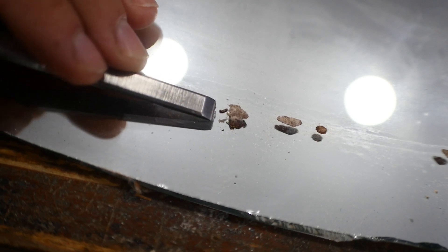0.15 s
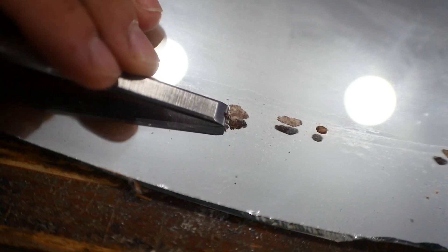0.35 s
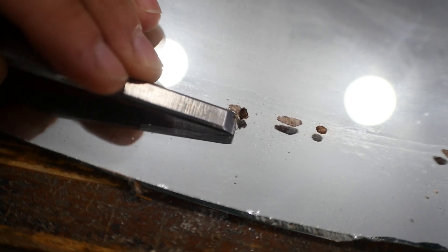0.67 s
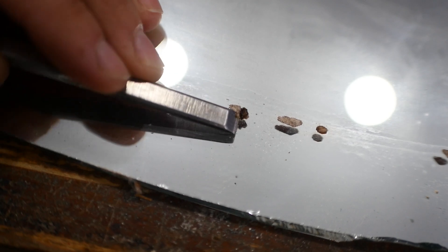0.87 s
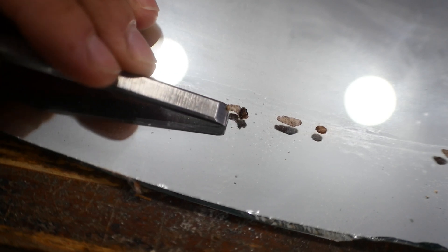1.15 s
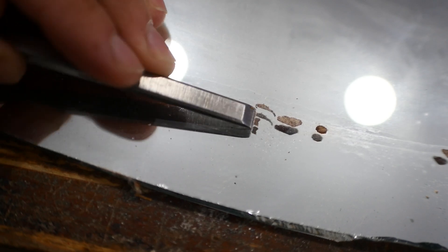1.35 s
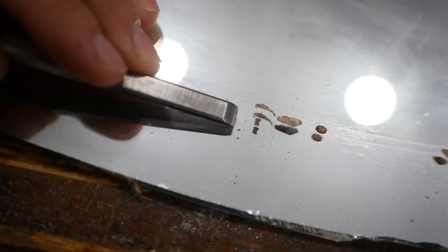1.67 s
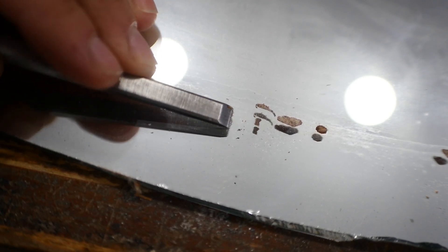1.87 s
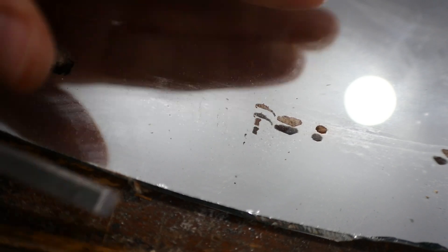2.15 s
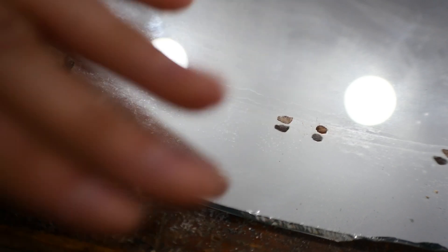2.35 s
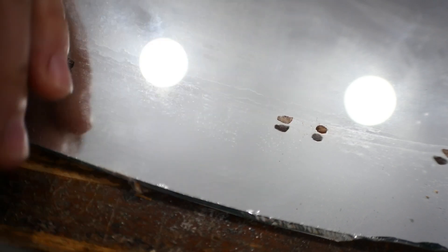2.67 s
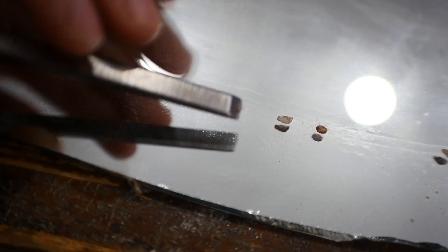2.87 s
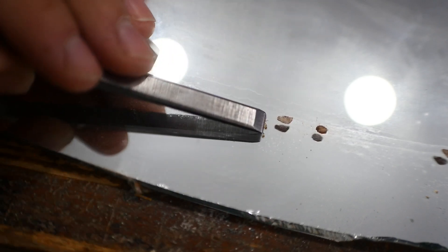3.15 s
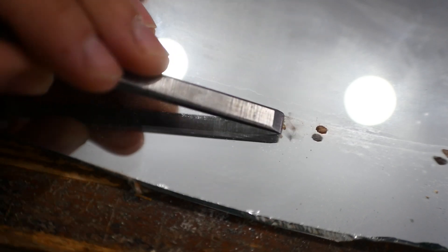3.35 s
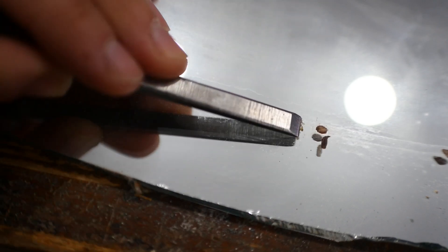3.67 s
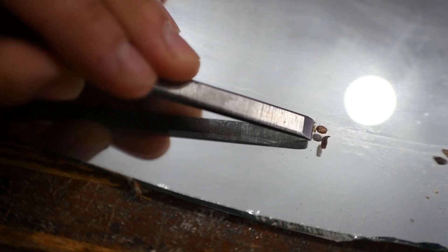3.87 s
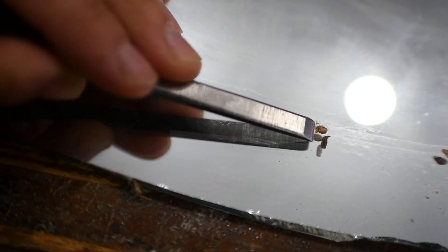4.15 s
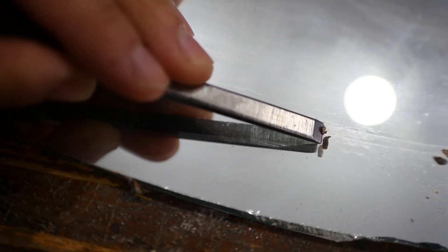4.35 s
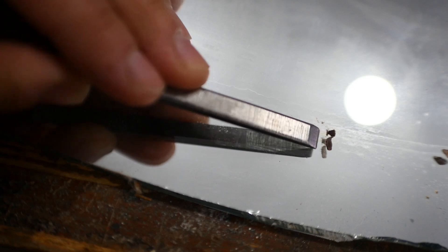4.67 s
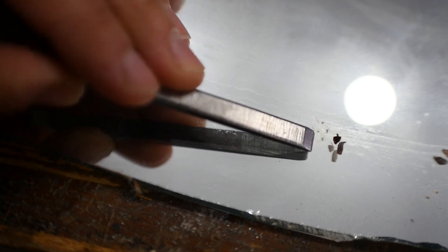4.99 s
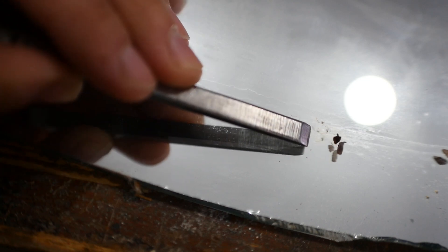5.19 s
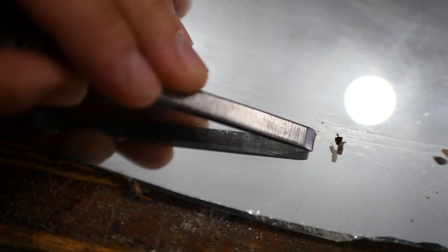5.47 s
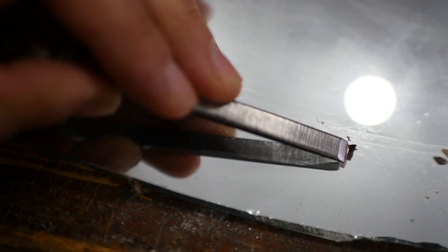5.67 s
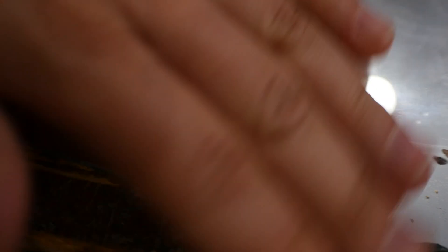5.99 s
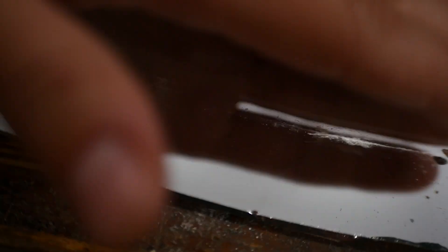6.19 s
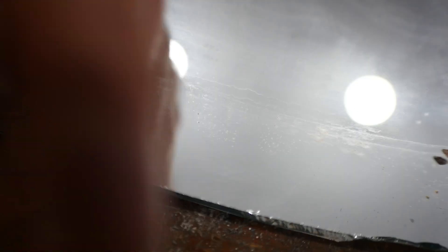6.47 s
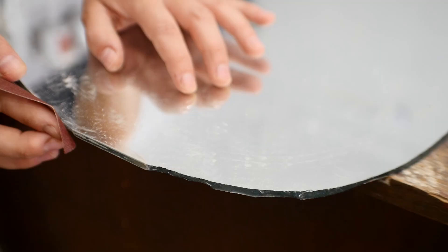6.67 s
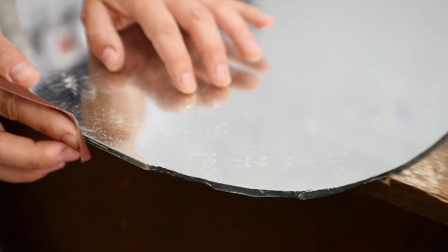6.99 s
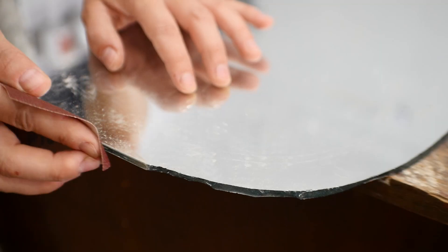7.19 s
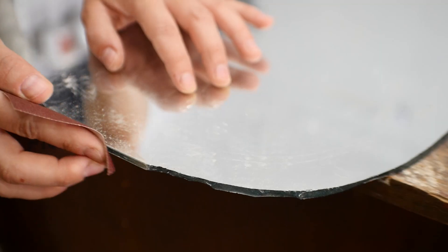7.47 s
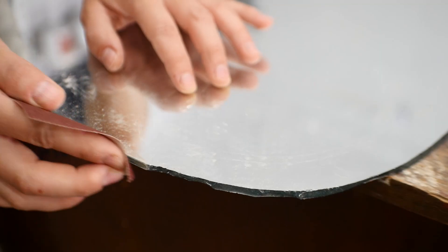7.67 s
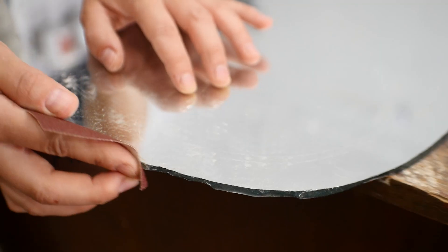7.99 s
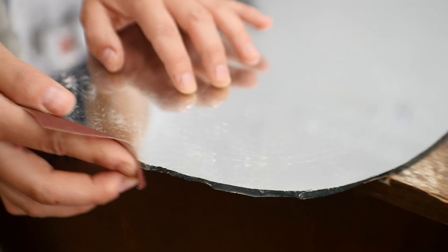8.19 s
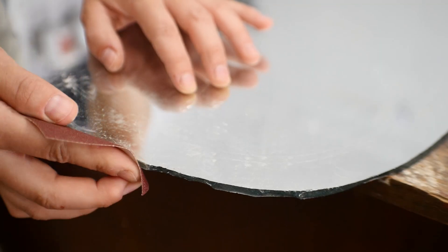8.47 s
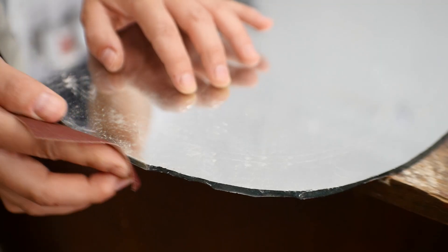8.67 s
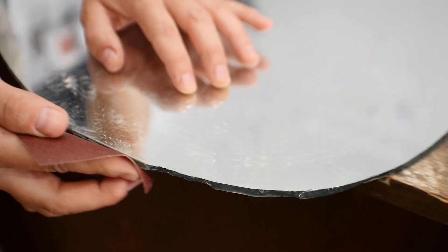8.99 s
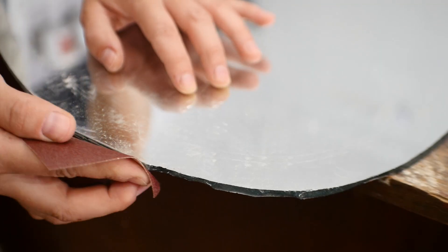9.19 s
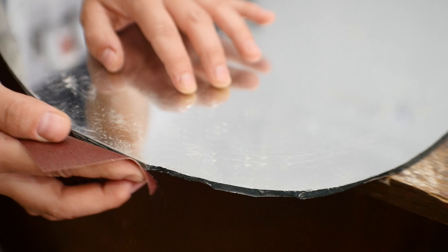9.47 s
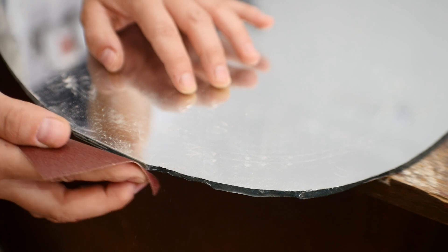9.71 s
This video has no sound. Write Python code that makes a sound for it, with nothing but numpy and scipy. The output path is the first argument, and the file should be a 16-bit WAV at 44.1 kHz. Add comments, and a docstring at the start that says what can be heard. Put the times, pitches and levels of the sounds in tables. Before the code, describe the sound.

Close up in a quiet workshop, a steel bar picks at dried lumps on a mirror with small bright ticks and thin slides. A palm swishes crumbs away, the bar clanks flat near three seconds, and faint picking resumes. More wipes with soft thuds follow, then abrasive paper rubs the glass edge in fast, gritty strokes to the end.

```python
"""Scraping and sanding a mirror

A quiet workshop, microphone close to a round mirror on a wooden bench. A steel scraper ticks and slides
on dried lumps: noise bursts ring steel, pane and bench. A palm hisses as it wipes the crumbs away, and
the bar comes down flat with a clank. Then abrasive paper rubs the edge, about eight strokes a second:
gritty noise swells between the turns and the glass sings faintly in its resonances. Room tone lies under it.
"""
import sys
import numpy as np
from scipy import signal
from scipy.fft import rfft, irfft, next_fast_len
from scipy.io import wavfile
from scipy.ndimage import uniform_filter1d, map_coordinates

SR = 44100
rng = np.random.default_rng(int(sys.argv[2]) if len(sys.argv) > 2 else 0)


def wav_out(sig):
    """Save sig, one row per channel (or a flat mono array), as 16-bit PCM at SR to the path in sys.argv[1]."""
    wavfile.write(sys.argv[1], SR, np.round(np.clip(np.atleast_2d(sig).T, -1, 1) * 32767).astype(np.int16))


N = 433931
T = np.arange(N) / SR


def amp(db):
    """Decibels to linear gain."""
    return 10 ** (np.asarray(db) / 20)


def unit(x):
    """Scale to rms 1."""
    return x / np.sqrt(np.mean(x ** 2) + 1e-20)


def along(points, hz):
    """Interpolate (Hz, value) points on a log frequency axis."""
    f, v = np.transpose(points)
    return np.interp(np.log(hz + 1), np.log(f + 1), v)


def wobble(rate):
    """A smooth random curve, rate knots a second."""
    knots = rng.standard_normal(int(N * rate / SR) + 4)
    return map_coordinates(knots, [T * rate])


def filtered(x, response):
    """Filter x by a complex response of frequency."""
    n = x.shape[-1]
    m = next_fast_len(n + SR // 2)
    return irfft(rfft(x, m) * response(np.fft.rfftfreq(m, 1 / SR)), m)[..., :n]


def modes(table, f):
    """Causal sum of resonances, each row a centre in Hz, a width in Hz and a peak in dB."""
    f = f.astype(np.float32)
    return sum(float(amp(db) * w) * 1j * f / (c * c - f * f + 1j * w * f) for c, w, db in table)


def band(f, lo_hz, hi_hz):
    """Causal soft-edged band."""
    return (1j * f / (lo_hz + 1j * f) * hi_hz / (hi_hz + 1j * f)) ** 2


def heard(pair, response, alike):
    """Two unrelated signals through a response of mean power 1 become left and right with the given likeness."""
    def mix(f):
        colour = response(f)
        turn = np.arccos(np.clip(along(alike, f), -1, 1)) / 2
        return colour / np.sqrt(np.mean(abs(colour) ** 2)) * np.array([np.cos(turn), np.sin(turn)])
    mid, side = filtered(pair, mix)
    return np.array([mid + side, mid - side])


def patchy(x, depth_db, size=6):
    """Random gain in patches of frequency and time."""
    z = signal.stft(x, nperseg=512)[2]
    field = uniform_filter1d(rng.standard_normal(z.shape[1:]), 6, 0)
    field = uniform_filter1d(field, size, 1)
    return signal.istft(z * amp(depth_db * unit(field)), nperseg=512)[1][:, :x.shape[1]]


def grit(spiky_db, patchy_db, size=N):
    """Two channels of friction noise, rms 1: grains of uneven size, in patches."""
    grains = np.repeat(rng.standard_normal(size // 24 + 1), 24)[:size]
    noise = rng.standard_normal((2, size)) * amp(spiky_db * grains)
    return unit(patchy(noise, patchy_db))


def bursts(s, db, ms, crumbs_db):
    """Noise of contacts: each falls 20 dB per contact time, then crumbs grind on more faintly."""
    env, t = np.zeros(N + SR), np.arange(SR // 4) / SR
    for start, level, life in np.broadcast(s, db, ms):
        shape = amp(-20 * t / (abs(life) / 1000)) + amp(crumbs_db - 20 * t / 0.056)
        onset = 1 - np.exp(-t / (abs(life) / 9000))
        env[round(start * SR):][:len(t)] += amp(level) * shape * onset
    return env[:N] * rng.standard_normal((2, N))


def swell(start, start_db, climb, top_db, rise, fall, hold=0):
    """Gain of gestures that climb from start_db to top_db and hold, coming and going at the given dB per second."""
    power = np.zeros(N)
    for a, a_db, s, b_db, up, down in np.broadcast(start, start_db, np.abs(climb) + 1e-4, top_db, rise, fall):
        knots = np.cumsum([a - 60 / up, 60 / up, s, abs(hold) + 1e-4, 60 / down])
        level_db = np.interp(T, knots, [a_db - 60, a_db, b_db, b_db, b_db - 60])
        power += amp(level_db) ** 2
    return np.sqrt(power)


# Spectrum of the room tone. Each row: frequency in Hz, relative level in dB.
AIR_SPECTRUM = [(15, -46), (25, -16), (76, -16), (141, -1), (180, -2), (335, -4), (677, -9), (840, -10.5),
                (1160, -8.5), (1480, -15), (2990, -21.5), (8140, -28), (10400, -24), (14000, -30.5),
                (16000, -38)]
# Narrow bands in the room tone. Each row: centre in Hz, width in Hz, relative level in dB.
HUM_BANDS = [(182.2, 4.7, 10), (227, 11, 1.2), (528, 3.2, 1.3), (680, 16, 6.3), (1200, 20, 1.5)]
# Left-right likeness of distant sound. Each row: frequency in Hz, likeness from -1 to 1.
FAR_LIKENESS = [(60, 0.84), (180, 1), (550, 0.82), (1650, -0.32), (4970, 0.094), (15000, 0.72)]
AIR_DB = -58  # centre of a slowly wandering level


def room_tone():
    """Distant rumble through the walls over the microphone's own hiss."""
    colour = lambda f: amp(along(AIR_SPECTRUM, f)) * (1 + .5 * abs(modes(HUM_BANDS, f)))
    tone = heard(grit(.1, 1.2), colour, FAR_LIKENESS)
    return amp(AIR_DB + 0.72 * wobble(3.105)) * unit(tone)


# Left-right likeness at close distance, for all work on the mirror. Each row: frequency in Hz, likeness.
NEAR_LIKENESS = [(60, 1), (180, 1), (550, 0.97), (1650, 0.4), (4970, 0.52), (15000, 0.49)]
# Scraper contacts. Each row: start in seconds, then drive of steel, pane and bench in dB.
CONTACTS = [(0.105, -47, -74, -74), (0.409, -51, -43.5, -41), (0.4198, -47.5, -54, -44),
            (0.6281, -59, -43.5, -36.5), (0.6529, -28.5, -34, -35), (0.701, -49, -61, -45),
            (0.9169, -45, -48, -42), (0.9594, -61, -57, -53), (1.1424, -62, -57, -31.5),
            (1.3565, -35.5, -48, -44), (1.3657, -23.5, -31, -33.5), (1.396, -29, -39.5, -36),
            (1.481, -52, -60, -54), (1.517, -48.5, -52, -49.5), (1.6327, -54.5, -59, -53),
            (1.662, -53.5, -56, -50), (1.7065, -55.5, -72, -62), (1.7697, -52, -65, -50.5),
            (1.835, -54, -61, -52.5), (1.947, -55.5, -65, -66), (2.057, -57, -56, -51),
            (2.1435, -41, -51, -54), (2.3297, -35.5, -40.5, -43.5), (3.4234, -29.5, -38.5, -34.5),
            (3.445, -44, -57, -47), (4.251, -36.5, -48.5, -43.5), (4.5304, -45, -63, -51.5),
            (5.0654, -56, -76, -67), (5.1073, -56, -75, -56), (5.24, -35.5, -68, -60),
            (5.432, -45.5, -63, -47), (5.6984, -54.5, -68, -74), (5.803, -49.5, -56, -52),
            (6.3174, -36.5, -63, -68), (6.4827, -42, -46, -46)]
# The end of an earlier knock. One row: the same columns, then times longer than a contact.
FADING_KNOCK = (0.0, -62, -66, -51, 5)
# Resonances of the steel bar. Each row: centre in Hz, width in Hz, relative level in dB.
STEEL_MODES = [(2480, 180, -6), (5170, 170, -9), (5880, 66, -21), (6980, 48, 1), (7370, 73, 1.5),
               (8400, 60, -10), (9140, 50, 4), (9620, 56, 1), (10080, 220, 4.5), (11300, 28, 8.5),
               (12300, 31, -36), (12700, 39, -5), (13000, 50, -31), (13400, 43, -11)]
# Resonances of the glass pane, same columns as the steel.
PANE_MODES = [(1086, 46, 7), (1203, 93, 0.5), (1314, 67, 7), (1370, 20, -5), (1644, 18, 1.5),
              (1885, 140, 4.5), (2140, 60, -12), (2194, 45, -0.32), (2450, 46, 0)]
# Resonances of the wooden bench, same columns as the steel.
BENCH_MODES = [(177, 49, 13), (236, 27, 1), (333, 23, 0), (411.5, 36, 7), (499, 76, 5.5), (582, 7.7, 3.5),
               (689, 20, -0.5), (822, 15, -3.5), (1156, 58, 1)]
# The tip slides over the glass. Each row: fastest moment in seconds, length in seconds, level in dB.
SLIDES_OF_TIP = [(0.8, 0.049, -65), (0.946, 0.055, -60), (1.44, 0.11, -60), (1.544, 0.15, -61.5),
                 (1.67, 0.21, -66), (1.773, 0.058, -60), (1.9, 0.41, -69), (2.175, 0.21, -54.5),
                 (2.837, .14, -69), (3.592, 0.074, -61), (3.725, 0.092, -54), (3.942, .12, -57),
                 (4.436, .2, -67), (4.657, 0.082, -62), (4.766, 0.052, -73), (4.88, .1, -61.5),
                 (5.11, .12, -79), (5.437, 0.29, -60.5), (5.704, .14, -65), (5.85, 0.22, -58.5)]
# The tip drags hard enough to rumble in the bench. Each row: start in seconds, length in seconds, level in dB.
BENCH_JUDDERS = [(4.862, 0.062, -58), (5.417, .014, -54)]
# Friction spectrum on glass, for tip and palm. Each row: frequency in Hz, relative level in dB.
SKIN_SPECTRUM = [(590, -40), (1000, -8), (1100, -10), (1230, -14), (1340, -12), (1670, -1), (3840, -10),
                 (9940, -5), (13100, -8), (16000, -20)]
STEEL_MS, PANE_MS, BENCH_MS = 10.3, 7.1, 19.7  # time in which the drive of each part falls 20 dB
STRAY_PER_S, STRAY_DB, STRAY_SPREAD_DB = 2.5, -63, 3  # faint ticks at chance moments
STRAY_END_S = 5.9  # no stray ticks after this; a few contacts of the table still follow


def scraper():
    """Each contact rings the steel bar, the pane and the bench; between contacts the tip slides."""
    contacts = [FADING_KNOCK, *[(*row, 1) for row in CONTACTS]]
    s, steel_db, pane_db, bench_db, longer = np.transpose(contacts)
    steel = lambda f: 2.0 * modes(STEEL_MODES, f) + 1.26 * band(f, 3500, 19000)
    pane = lambda f: (1.4 * modes(PANE_MODES, f) + 0.62) * band(f, 830, 4200) ** 2
    bench = lambda f: (3.6 * modes(BENCH_MODES, f) + 0.37) * band(f, 75, 1860) ** 2

    stray_s = np.cumsum(rng.exponential(1 / STRAY_PER_S, size=40))
    stray_db = STRAY_DB + STRAY_SPREAD_DB * rng.standard_normal(size=40)
    early = stray_s < STRAY_END_S
    stray = bursts(stray_s[early], stray_db[early], STEEL_MS, -16)

    start, length, judder_db = np.transpose(BENCH_JUDDERS)
    judder = swell(start, judder_db, length, judder_db, 900, 600) * grit(4.4, 2)

    ticks = heard(bursts(s, steel_db, STEEL_MS * longer, -15) + stray, steel, NEAR_LIKENESS)
    ticks += heard(bursts(s, pane_db, PANE_MS * longer, -11.5), pane, NEAR_LIKENESS)
    ticks += heard(bursts(s, bench_db, BENCH_MS * longer, -13) + judder, bench, NEAR_LIKENESS)

    fast, length, db = np.transpose(SLIDES_OF_TIP)
    slope = 2 * 20 / np.abs(length)  # 20 dB down at both ends
    moving = swell(fast, db, 0, db, slope, slope)
    # the sliding tip also excites the steel modes
    slide = lambda f: (amp(along(SKIN_SPECTRUM, f)) * abs(band(f, 1300, 40000))
                       * (1 + 1.8 * abs(modes(STEEL_MODES, f))))
    return ticks + heard(moving * grit(1.8, 2), slide, NEAR_LIKENESS)


# Palm wiping the glass. Each row: touch in seconds, hiss at touch in dB, time to full speed in seconds,
# hiss at full speed in dB, how far the lower rustle lies under the hiss in dB.
PALM_WIPES = [(2.265, -54.5, 0.073, -42.5, 10), (2.537, -48, 0.0092, -45.5, 31),
              (2.683, -52, 0.025, -49, 28), (5.906, -52.5, 0.064, -52, 11), (5.999, -51, 0.096, -41.5, 22),
              (6.27, -60.5, 0.053, -47.5, 15), (6.464, -54, 0.05, -50.5, 21)]
# Palm landing on the pane. Each row: start in seconds, thud in dB, scuff in dB.
PALM_LANDINGS = [(2.525, -40, -62), (2.68, -44, -50.5), (6.283, -34.5, -60), (6.46, -36.5, -55.5)]
LAND_DB_PER_S, LIFT_DB_PER_S = 1500, 418  # how fast the hiss comes and goes
SCUFF_DB_PER_S = 600  # how fast the scuff of a landing fades
HOLD_S = 0.019  # full speed lasts this long


def palm():
    """Skin hisses over glass and crumbs; each landing thuds the pane on the bench."""
    touch, touch_db, climb, fast_db, under_db = np.transpose(PALM_WIPES)
    wiping = swell(touch, touch_db, climb, fast_db, LAND_DB_PER_S, LIFT_DB_PER_S, HOLD_S)
    crumbs = swell(touch, touch_db - under_db, climb, fast_db - under_db,
                   LAND_DB_PER_S, LIFT_DB_PER_S, HOLD_S)
    s, thud_db, scuff_db = np.transpose(PALM_LANDINGS)
    crumbs += swell(s, scuff_db, 0.0021, scuff_db, 4000, SCUFF_DB_PER_S)

    skin = lambda f: amp(along(SKIN_SPECTRUM, f)) * abs(band(f, 5300, 40000))
    soft = lambda f: modes([(170, 36, 9), (240, 57, -19)], f) * band(f, 115, 370) ** 2
    hiss = heard(wiping * grit(0.45, 3.6), skin, NEAR_LIKENESS)
    rustle = heard(crumbs * grit(4.1, 2.1), lambda f: band(f, 810, 4600), NEAR_LIKENESS)
    thud = heard(bursts(s, thud_db, 29.0, -12), soft, NEAR_LIKENESS)
    return hiss + rustle + thud


# The bar comes down flat on the glass. Each row: start in seconds, rattle in dB before the chatter.
FLAT_CLANKS = [(3.0387, -26), (5.242, -54)]
# Resonances of bar and pane together. Each row: centre in Hz, width in Hz, relative level in dB.
FLAT_MODES = [(210, 80, -3), (340, 85, 2.5), (456.7, 15, 9.5), (527, 58, 5.5), (640, 20, -3),
              (1116, 48, 4.5), (1170, 34, 1), (1370, 66, 6.5), (1400, 12, 12.5), (1635, 18, 9),
              (1830, 65, -16), (2570, 15, 0), (2821, 14, 5), (3174, 59, 1.5), (3338, 28, -10),
              (4630, 97, -5), (4770, 150, 2.5), (5300, 35, -9), (6700, 39, 1), (7000, 30, 2), (7600, 45, 0),
              (8760, 35, 0), (9700, 49, 9), (10100, 35, -2), (12060, 30, -12)]
BLOW_DB, BLOW_S = 21.5, .002  # the blow itself over the rattle, and its delay
CHATTER_DB, CHATTER_PER_S = 3, 70  # the bar chatters on the glass: random gain, knots a second


def clank():
    """A few milliseconds of rattle and a single blow drive the modes of bar and pane together."""
    s, db = np.transpose(FLAT_CLANKS)
    both = lambda f: (modes(FLAT_MODES, f) + 0.074) * band(f, 160, 11300)
    drive = bursts(s, db, 13.4, -9.5)
    blow_at = np.round((s + BLOW_S) * SR).astype(int)
    drive[:, blow_at] += amp(db + BLOW_DB)
    return heard(drive, both, NEAR_LIKENESS) * amp(CHATTER_DB * wobble(CHATTER_PER_S))


# Sanding strokes. Each row: turn in seconds, share of the stroke before full speed,
# relative level at full speed in dB.
SANDING_STROKES = [(6.734, 0.24, -43.5), (6.839, 0.21, -41), (6.904, 0.61, -32), (7.056, .68, -29.5),
                   (7.149, .56, -25.5), (7.31, 0.35, -32.5), (7.402, 0.54, -29.5), (7.541, .22, -33),
                   (7.669, 0.75, -33), (7.797, 0.47, -28.5), (7.924, 0.53, -30), (8.063, 0.39, -27),
                   (8.194, 0.68, -30.5), (8.318, 0.67, -28.5), (8.44, 0.64, -26), (8.564, 0.38, -26.5),
                   (8.692, 0.66, -29.5), (8.814, .39, -26.5), (8.936, 0.7, -28.5), (9.053, .45, -25),
                   (9.178, 0.52, -27), (9.294, 0.38, -24), (9.424, .67, -28.5), (9.536, 0.37, -28),
                   (9.665, 0.57, -30), (9.779, 0.37, -28), (9.9, .6, -30)]
# The paper settles on the edge. Each row: time in seconds, relative level at the turns in dB,
# bench minus glass in dB, ring of the upper modes in dB.
PAPER_SETTLING = [(6.73, -48, 1, -14), (6.84, -54.5, 1.5, -24), (6.91, -49, -2, -10), (7.06, -36, -3, -26),
                  (7.31, -37, 0.5, 0), (7.4, -44, -3, -7), (7.54, -41.5, -1.5, -4), (7.67, -46, -7.5, 2),
                  (7.92, -40, -7, 3.3), (8.56, -36, -8, -2.2), (9.84, -38.5, -7, 4.5)]
# Fine grit over the glass. Each row: time in seconds, relative level in dB.
FINE_GRIT = [(6.75, -5), (6.87, -4.5), (6.99, 6.5), (7.12, -1.5), (7.57, -0.5), (7.76, 1), (8.3, 1.5),
             (8.52, -0.5), (8.7, 1), (9.1, -1.5), (9.55, 0.7), (9.84, -1)]
# Paper catching on chips of the edge. Each row: start in seconds, level in dB.
CHIP_SNAGS = [(6.9452, -24), (6.9677, -30), (6.9737, -28), (6.9982, -10), (7.4361, -36), (7.4538, -14),
              (7.4596, -14.5)]
# Spectrum of the abrasive rub. Each row: frequency in Hz, relative level in dB.
PAPER_SPECTRUM = [(35, -64), (60, -41), (149, -9), (274, -9), (515, -6), (698, -9.5), (803, -7),
                  (1110, -7.5), (1860, -3.5), (3040, -4), (5330, -7), (7570, -7), (10300, -1.5),
                  (14900, -14.5), (16000, -38)]
# Resonances of the mirror's edge. Each row: centre in Hz, width in Hz, relative level in dB.
EDGE_MODES = [(287, 19, 7), (398, 9.1, 9.5), (523, 33, -1.5), (835, 9.8, 10.5), (1193, 7.7, 14),
              (1466, 29, -0.5), (1596, 17, -4), (1690, 37, 7), (1853, 9.6, 9), (1898, 10.6, 15),
              (2134, 11, 8), (2317, 26, -7), (2310, 31, 2.5), (2874, 7.6, 8), (3483, 100, 2), (3640, 40, 9),
              (3860, 43, -5), (4080, 23, 8), (4100, 78, -1), (4830, 57, 1), (5280, 27, 7), (5420, 44, 8.5),
              (6360, 47, 6), (6840, 23, 10), (8540, 29, -12), (9140, 62, -5.5), (10390, 83, -8),
              (10970, 200, -7.5)]
# Stereo placing of the rub. Each row: frequency in Hz, left minus right in dB.
SIDE_LEAN = [(60, 2), (380, -0.5), (2380, 0.5), (15000, 2)]
DAMPING = 0.12  # share of the dip at the turns that the resting paper also takes out of the ring


def sanding():
    """The hand slows at every turn and is fastest mid-stroke; grit drives edge, pane and bench."""
    turn, share, fast_db = np.transpose(SANDING_STROKES)
    stroke_s = np.diff(turn, append=turn[-1] + np.diff(turn).mean())
    fast = turn + np.clip(share, .05, .95) * stroke_s
    first = round(6.7 * SR)  # silent until here
    t = T[first:]

    knots = np.ravel([turn, fast], order="F")  # turn, full speed, turn, ..
    place = np.interp(t, knots, np.arange(len(knots)))
    k = np.minimum(place.astype(int), len(knots) - 2)
    nearness = np.where(k % 2, 1 - (place - k), place - k)  # 0 at a turn, 1 at full speed

    when, *settling = np.transpose(PAPER_SETTLING)
    turn_db, bench_db, upper_db = [np.interp(t, when, column) for column in settling]
    full_db = np.interp(t, fast, fast_db)
    speed_db = turn_db + (full_db - turn_db) * np.sin(np.pi / 2 * nearness) ** 1.02
    heavy_db = uniform_filter1d(speed_db, SR // 20)  # the bench follows a 50 ms average
    touch = np.clip((t - turn[0]) / 0.016, 0, 1)
    glass = touch * amp(speed_db)
    fine = touch * amp(speed_db + np.interp(t, *np.transpose(FINE_GRIT)))
    wood = touch * amp(heavy_db + bench_db)

    body = lambda f: amp(along(PAPER_SPECTRUM, f))
    above = lambda f, hz: 1 / (1 + (hz / (f + 1)) ** 6)  # share of power above a corner
    middle = lambda f: body(f) * np.sqrt(above(f, 1670) * (1 - above(f, 6730)))
    treble = lambda f: body(f) * np.sqrt(above(f, 5170))
    bass = lambda f: body(f) * np.sqrt(1 - above(f, 1520))
    rub = heard(glass * grit(1.33, 1.64, len(t)), middle, NEAR_LIKENESS)
    rub += heard(fine * grit(1.2, 1.4, len(t)), treble, NEAR_LIKENESS)
    rub += heard(wood * grit(2.2, 1.06, len(t)), bass, NEAR_LIKENESS)

    ring = filtered(rub, lambda f: modes([m for m in EDGE_MODES if m[0] < 4500], f))
    upper = filtered(rub, lambda f: modes([m for m in EDGE_MODES if m[0] > 4500], f))
    ring += amp(upper_db) * upper
    ring *= amp(DAMPING * (speed_db - full_db))
    ring = patchy(ring, 3.5, size=11)  # the modes come and go at random

    crack = lambda f: modes([(9800, 1300, -2.5), (11700, 1800, 3)], f) ** 2
    snags = heard(bursts(*np.transpose(CHIP_SNAGS), 1.6, -42)[:, first:], crack, NEAR_LIKENESS)
    sides = lambda f: amp(np.outer([.5, -.5], along(SIDE_LEAN, f)))
    sound = filtered(0.79 * (rub + 0.63 * ring), sides) + snags
    return np.pad(sound, ((0, 0), (first, 0)))


# Decay of the workshop. Each row: frequency in Hz, time to fall 60 dB in seconds.
SHOP_DECAY = [(150, 0.41), (1000, 0.5), (3000, 0.33), (8000, 0.16)]


def shop(x):
    """Reverberation: noise whose every frequency dies at its own speed, with the likeness of distant sound."""
    hz, t, z = signal.stft(rng.standard_normal((2, SR // 2)), SR, nperseg=256)
    turn = np.arccos(np.clip(along(FAR_LIKENESS, hz), -1, 1))[:, None] / 2
    mid, side = z[0] * np.cos(turn), z[1] * np.sin(turn)
    decay = amp(-60 * t / along(SHOP_DECAY, hz)[:, None])
    tail = signal.istft(np.array([mid + side, mid - side]) * decay, SR, nperseg=256)[1]
    late = np.pad(x.mean(0), (200, 0))[None]  # the answer starts 200 samples after the sound
    return signal.oaconvolve(late, tail / np.linalg.norm(tail[0]), axes=1)[:, :N]


def scene():
    """Scraper, clank and palm with the workshop's answer, then sanding without it, over room tone."""
    bench_work = scraper() + clank() + palm()
    return bench_work + amp(-7.0) * shop(bench_work) + sanding() + room_tone()


NOTCH_HZ, TOP_HZ = 7855, 15620


def record(dry):
    """The camera cuts a narrow notch in the treble and keeps nothing above its band limit."""
    return filtered(dry, lambda f: (1 - modes([(NOTCH_HZ, 70, -1)], f)) * (f < TOP_HZ))


dry = scene()
out = record(dry)
wav_out(out)
```